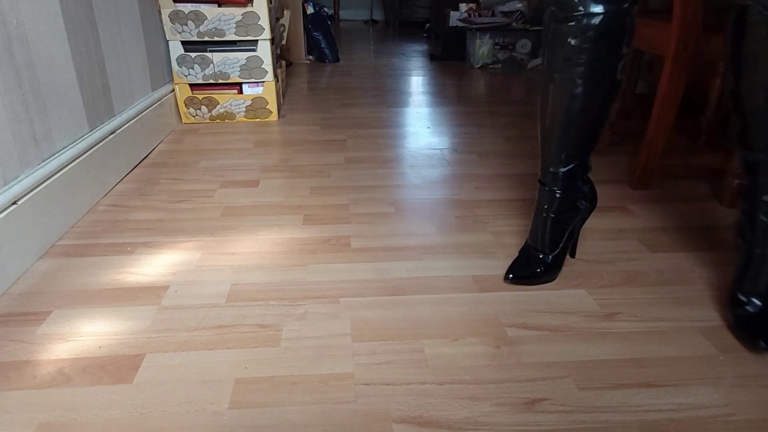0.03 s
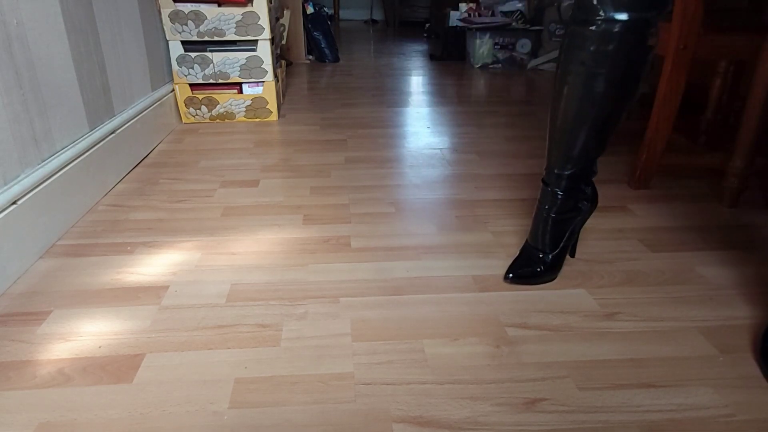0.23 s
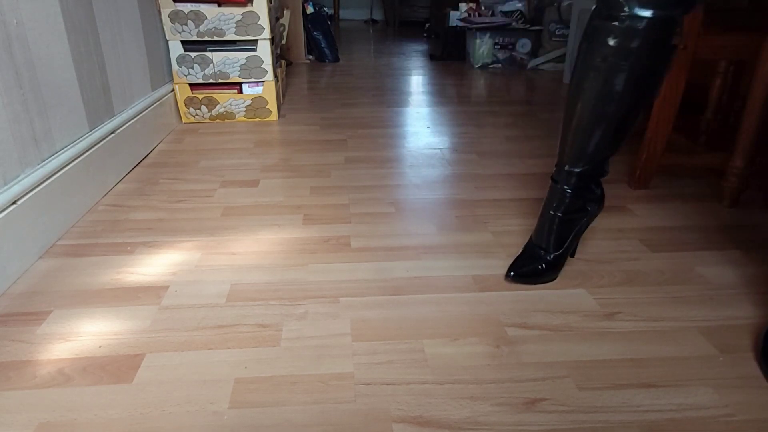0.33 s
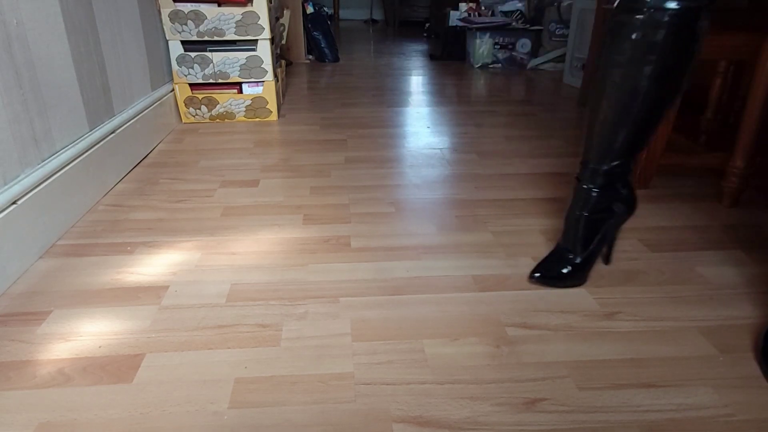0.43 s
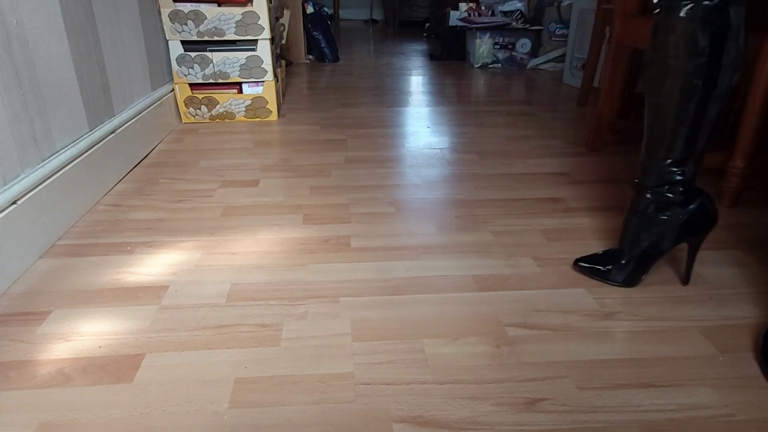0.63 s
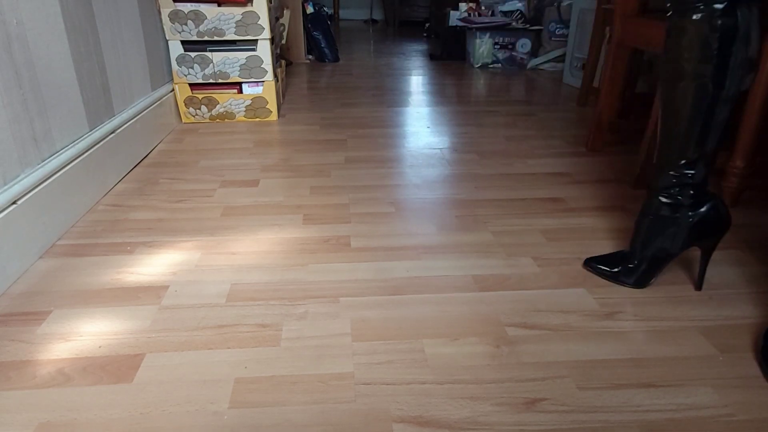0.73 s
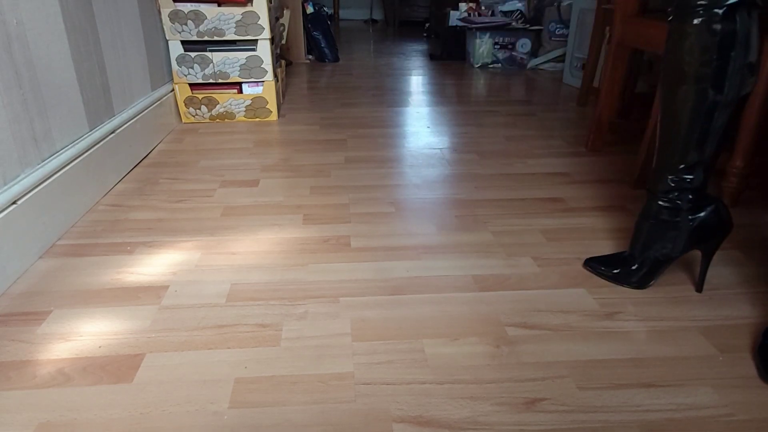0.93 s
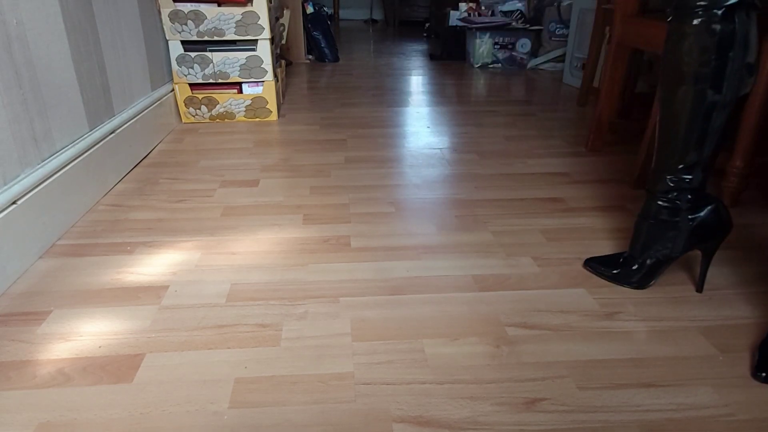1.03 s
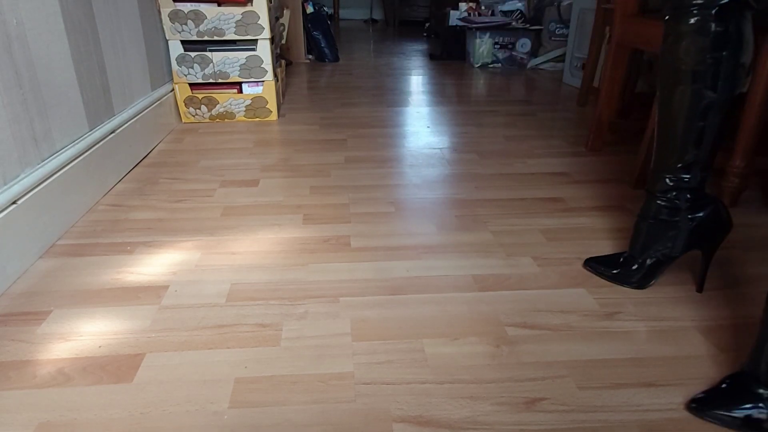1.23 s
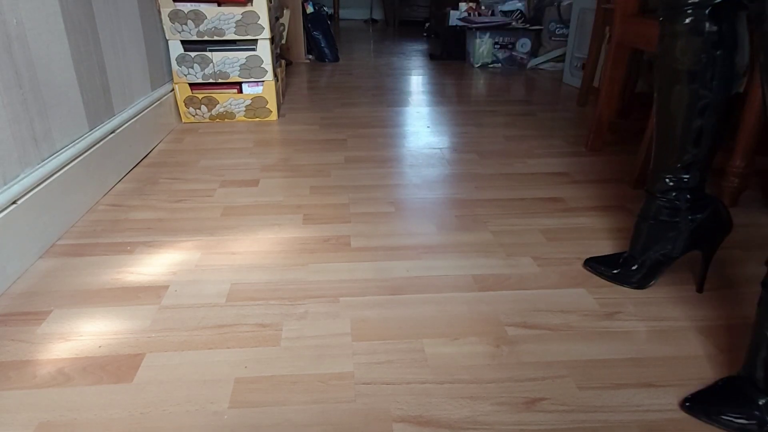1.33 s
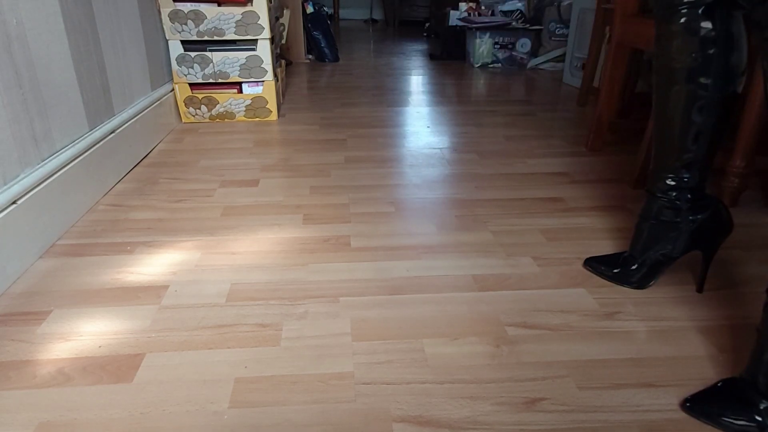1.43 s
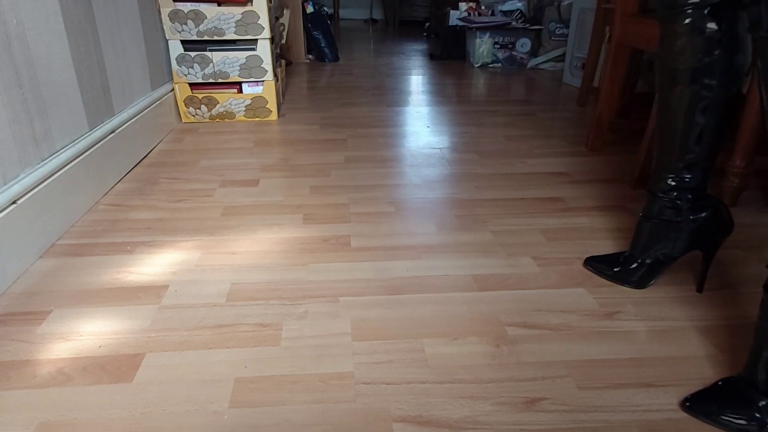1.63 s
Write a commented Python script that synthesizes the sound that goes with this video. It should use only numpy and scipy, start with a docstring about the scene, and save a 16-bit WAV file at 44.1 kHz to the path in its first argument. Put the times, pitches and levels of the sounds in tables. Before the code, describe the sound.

A few slow footsteps in heeled boots sound close by and a little to the right in a small, bare-sounding room. Two firm clicking thuds on laminate come first, then softer steps, while the boots creak and tick as they flex.

```python
"""A few slow steps of high-heeled boots on laminate, slightly to the right, in a small bare room.
Each heel or sole contact is a short thump of the boards plus a click; the floor sags and booms under
the weight. Walls return distinct echoes and the room rings on. The glossy boot shafts rustle, creak
and tick as they flex. Faint hum and hiss lie underneath."""
import sys
import numpy as np
from scipy import signal
from scipy.fft import rfft, irfft, next_fast_len
from scipy.io import wavfile

SR = 44100
rng = np.random.default_rng(int(sys.argv[2]) if len(sys.argv) > 2 else 0)


def store_pcm(level_fs):
    """Save levels as 16-bit WAV."""
    pcm = np.round(np.clip(level_fs, -1, 1) * 32767).astype(np.int16)
    wavfile.write(sys.argv[1], SR, np.atleast_2d(pcm).T)


N = 74970
FFT_SIZE = next_fast_len(N + SR // 2)
TIME_S, HZ = np.arange(N) / SR, np.fft.rfftfreq(FFT_SIZE, 1 / SR)
LEFT_LAG_S, TREBLE_PAN_DB = 0.000401, -1.3

# heel and sole contacts: start_s, thump_db, low_edge_hz, high_edge_hz, click_db, click_edge_hz
CONTACTS = [(.001, -58, 294, 1300, -73, 3130), (0.2208, -31.5, 280, 609, -29, 4800),
            (0.2521, -36, 297, 533, -54, 3000), (.3150, -28.5, 186, 778, -32.5, 2530),
            (.7978, -47, 210, 1010, -44.5, 8900), (0.9509, -33, 295, 785, -45.5, 1600),
            (1.0926, -40.5, 332, 814, -45.5, 2000), (1.166, -50, 280, 846, -55, 2980),
            (1.3006, -40.5, 330, 582, -42, 3500), (1.3320, -46.5, 380, 596, -65, 3000),
            (1.616, -66.5, 410, 1280, -55.5, 3050)]
# contact click spectrum: freq_hz, gain_db
CLICK_SPECTRUM = [(300, 10), (900, 3), (1200, 3.5), (1550, 5.5), (1750, 3), (2100, -3), (2600, 0),
                  (3200, -0.5), (4200, 6), (7000, -16), (15000, -31)]
# heel resonances: freq_hz, width_hz, strength_db
HEEL_RESONANCES = [(1546, 125, -8.5), (2600, 200, -9)]
# floor swings under load: start_s, pitch_hz, level_db, t60_s
FLOOR_SWINGS = [(.226, 150, -56, 0.49), (0.232, 70.2, -53, 0.9), (0.316, 111, -30.5, 0.14),
                (0.327, 80, -58, 0.083), (0.951, 106, -53.5, 0.2), (1.306, 103, -70.5, 0.65)]
# snaps of the boot material: start_s, level_db, pitch_hz, half_width_oct
FOLD_SNAPS = [(0.26, -52, 11000, .6), (0.2746, -46, 8000, 1), (0.2759, -36.5, 5200, .6),
              (0.296, -42.5, 8200, 0.31), (0.2997, -47.5, 6600, 0.17), (0.3984, -43.5, 6400, 1.1),
              (0.4312, -50, 10500, 0.48), (0.458, -48.5, 3970, 1.2), (0.473, -53, 6000, .4),
              (0.5025, -43.5, 5400, 0.63), (0.7989, -48, 6740, 0.46), (0.9274, -57, 6230, 0.19),
              (1.1802, -51, 5940, 0.47), (1.5831, -64, 10000, 0.68)]
# shaft flexes, rise and fall over 20 dB: peak_s, rise_s, fall_s, mid_db, low_trim_db, top_trim_db
SHAFT_FLEXES = [(.01, 0.28, 0.38, -71.5, 6.5, 1), (.18, 0.11, 0.17, -61, 6.5, 1.5),
                (0.317, 0.17, 0.22, -57, 8, 0), (.52, 0.098, 0.071, -81.5, 20, 17),
                (0.683, 0.14, 0.19, -63, 1.5, -4.5), (0.824, 0.034, 0.1, -66.5, 4, -2),
                (.93, .02, 0.081, -75, 4, -2), (.99, 0.13, 0.1, -73.5, -19, -8),
                (1.115, 0.16, 0.29, -71, 1.5, -0.5), (1.183, 0.16, 0.14, -69.5, -21, 2.5),
                (1.34, 0.085, 0.09, -62, 3, 0.5), (1.47, 0.25, 0.22, -73, 0, 0.5),
                (1.619, 0.039, 0.18, -77, -5, 0)]
# rustle spectra, three registers: freq_hz, gain_db
LOW_SPECTRUM = [(400, 0), (1100, -1), (1550, 1.5), (2000, 2.5), (2600, 4), (3200, -1), (4500, 6.5),
                (9000, -128)]
MID_SPECTRUM = [(1500, -28), (3100, -18.5), (4100, -7.5), (5500, -5.5), (7000, -7.5), (9000, -15.5),
                (15000, -27.5)]
TOP_SPECTRUM = [(3000, -60), (7000, -11), (9000, 2.5), (12000, 6.5), (15500, 0)]
# echoes off walls, ceiling and furniture: delay_s, gain_db
REFLECTIONS = [(.0026, -3), (.0052, -11), (.0112, -11), (.0132, -2), (.0171, -.5), (.0192, -12),
               (.0211, -7), (.0232, -11), (.028, -11), (.0301, -5), (.031, -4), (.0343, -7), (.037, -6),
               (.0387, -7), (.0447, -11), (.0483, -10), (.052, -8)]
# standing waves of the room: freq_hz, width_hz, strength_db
STANDING_WAVES = [(229.5, 8, 1), (297.3, 8.5, 4), (355.6, 10.4, 1.5), (468.6, 12, -7.5), (518.7, 23.6, 3),
                  (766, 4, -9)]
# reverberation time: freq_hz, t60_s
REVERB_DECAY = [(100, 0.37), (500, .42), (1500, 0.49), (5000, 0.11), (14000, 0.52)]
# room tone spectra: freq_hz, gain_db
HUM_SPECTRUM = [(20, -14), (32, -9), (42, -17.5), (55, 5.5), (75, -5.5), (100, 0), (140, -5.5), (200, -17),
                (340, -6), (500, -22.5), (780, -14), (1200, -75), (3000, -66)]
HISS_SPECTRUM = [(25, -44), (200, -14), (1200, -6.5), (2000, 1.5), (2600, -3), (3200, -10.5), (4200, -6),
                 (5200, -22), (8000, -9.5), (15000, -5)]


def footsteps(scatter_above_hz=894):
    """Each contact thumps the boards and clicks the heel; furniture smears the treble of the echoes."""
    direct = delay(0, LEFT_LAG_S)
    room_modes, heel_ring = resonances(STANDING_WAVES), resonances(HEEL_RESONANCES)
    mirrored = 1 / np.sqrt(1 + (HZ / scatter_above_hz) ** 8)
    thumps, clicks = np.zeros((2, 2, len(HZ)), complex)
    for start_s, thump_db, low_hz, high_hz, click_db, click_edge_hz in CONTACTS:
        early = early_echoes()
        smeared = early * scatter()
        walls = mirrored * early + np.sqrt(1 - mirrored ** 2) * smeared
        thump_room = (direct + amp(-2.5) * walls) * room_modes + amp(2.5) * reverb(correlation=0.72)
        click_room = direct + amp(-7) * smeared + amp(7) * reverb(correlation=0)
        colour = amp(curve(CLICK_SPECTRUM)) / (1 + (HZ / click_edge_hz) ** 2)
        click = crack(colour, t60_s=0.0074) * heel_ring
        thumps += amp(thump_db) * board_thump(low_hz, high_hz) * thump_room * delay(start_s)
        clicks += amp(click_db) * click * click_room * delay(start_s)
    return waveform(thumps) + pan(waveform(clicks), TREBLE_PAN_DB)


def board_thump(low_hz, high_hz):
    """Spectrum of one downward push on the boards: a cycle or two between the band edges."""
    highpass = signal.butter(2, low_hz, "high", fs=SR, output="sos")
    lowpass = signal.butter(7, high_hz, fs=SR, output="sos")
    push = -signal.sosfilt(np.vstack([highpass, lowpass]), signal.unit_impulse(SR // 10))
    return rfft(push / np.abs(push).max(), FFT_SIZE)


def floor_booms(attack_s=0.0088):
    """The loaded floor swings briefly at a low pitch."""
    swings = np.zeros(N)
    for start_s, pitch_hz, level_db, t60_s in FLOOR_SWINGS:
        age_s = np.maximum(TIME_S - start_s, 0)
        envelope = amp(level_db - 60 * age_s / t60_s) * (1 - np.exp(-(age_s / attack_s) ** 2))
        swings += envelope * np.sin(2 * np.pi * pitch_hz * age_s)
    return pan(filtered(swings, delay(0, left_lag_s=0.0008)), left_db=1.3)


def fold_ticks():
    """Folds of the boot material snap over and sound into the room."""
    ticks = np.zeros((2, len(HZ)), complex)
    for start_s, level_db, pitch_hz, half_width_oct in FOLD_SNAPS:
        colour = 1 / (1 + (np.log2((HZ + 1) / pitch_hz) / half_width_oct) ** 2)
        room = 1 + amp(5) * scatter() + amp(4.5) * reverb(correlation=0)
        ticks += amp(level_db) * crack(colour, t60_s=0.0045) * room * delay(start_s, LEFT_LAG_S)
    return pan(waveform(ticks), TREBLE_PAN_DB)


def shaft_rustle(low_db=-7, top_db=-6.5, roundness=1.014):
    """Each flex of a shaft swells and fades in three registers."""
    powers = np.zeros((3, N))
    for peak_s, rise_s, fall_s, mid_db, low_trim_db, top_trim_db in SHAFT_FLEXES:
        from_peak = np.maximum((peak_s - TIME_S) / rise_s, (TIME_S - peak_s) / fall_s)
        register_db = np.array([[low_db + low_trim_db], [0], [top_db + top_trim_db]])
        powers += amp(mid_db + register_db - 20 * np.abs(from_peak) ** roundness) ** 2
    spectra = LOW_SPECTRUM, MID_SPECTRUM, TOP_SPECTRUM
    rustle = sum(np.sqrt(power) * creak(spectrum) for power, spectrum in zip(powers, spectra))
    return pan(rustle, TREBLE_PAN_DB)


def creak(spectrum, slips_per_s=600, spread_db=4, grain_share=0.24):
    """Tiny stick-slip grains over a smooth rubbing hiss, rms 1."""
    colour = amp(curve(spectrum))
    slips = (rng.random(N) < slips_per_s / SR) * np.sign(rng.standard_normal(N))
    slips *= amp(spread_db * rng.standard_normal(N))
    grains = unit_rms(filtered(slips, colour * delay(0, LEFT_LAG_S)))
    return np.sqrt(grain_share) * grains + np.sqrt(1 - grain_share) * noise(colour, correlation=0.032)


def early_echoes(delay_spread=0.014, lag_spread_s=0.00021):
    """Echo response from one spot on the floor; each echo has its own direction."""
    impulse = np.zeros((2, SR // 10))
    for delay_s, gain_db in REFLECTIONS:
        path_s = delay_s * (1 + delay_spread * rng.standard_normal())
        arrival_s = path_s + lag_spread_s * rng.normal(0.78, 1) * np.array([.5, -.5])
        impulse[np.arange(2), np.round(arrival_s * SR).astype(int)] += amp(gain_db)
    return rfft(impulse, FFT_SIZE)


def scatter(t60_s=0.017):
    """Response of a brief uncoloured smear, different on each side."""
    smear = rfft(rng.standard_normal((2, SR // 20)) * amp(-60 * TIME_S[:SR // 20] / t60_s), FFT_SIZE)
    return smear / np.abs(smear)


def reverb(correlation, build_s=0.0097):
    """Response of the diffuse room tail, energy about 1 a side."""
    freq_hz, age_s, bands = signal.stft(white_pair(SR // 2, correlation), SR, nperseg=256)
    decay = amp(-60 * age_s / curve(REVERB_DECAY, freq_hz)[:, None])
    impulse = signal.istft(bands * decay, SR, nperseg=256)[1]
    impulse *= 1 - np.exp(-(TIME_S[:impulse.shape[1]] / build_s) ** 2)
    return rfft(impulse / np.linalg.norm(impulse[0]), FFT_SIZE)


def room_tone(whirr_hz=947, half_width_hz=72):
    """Low hum, narrow whirr, thin hiss."""
    whirr = noise(1 / (1 + ((HZ - whirr_hz) / half_width_hz) ** 4), correlation=0.28)
    hum = noise(amp(curve(HUM_SPECTRUM)), correlation=0.77)
    hiss = noise(amp(curve(HISS_SPECTRUM)), correlation=0.035)
    return amp(-72.5) * hum + amp(-74.5) * whirr + amp(-80.5) * hiss


def crack(colour, t60_s):
    """Spectrum of a short coloured burst, waveform peak near 1."""
    return unit_rms(colour) * scatter(t60_s)[0] * np.linalg.norm(amp(-60 * TIME_S / t60_s)) / 2


def resonances(modes):
    """Response of a direct path plus ringing modes."""
    return 1 + sum(amp(strength_db) * 1j * HZ * width_hz / (freq_hz ** 2 - HZ ** 2 + 1j * HZ * width_hz)
                   for freq_hz, width_hz, strength_db in modes)


def white_pair(samples, correlation):
    """White noise with a given left-right correlation."""
    mid, side = rng.standard_normal((2, samples))
    angle_rad = np.arccos(correlation) / 2
    return mid * np.cos(angle_rad) + side * np.sin(angle_rad) * np.array([[1], [-1]])


def noise(colour, correlation):
    """Coloured stereo noise, rms 1."""
    return unit_rms(filtered(white_pair(N, correlation), colour))


def delay(delay_s, left_lag_s=0):
    """Stereo delay response."""
    return np.exp(-2j * np.pi * HZ * (delay_s + np.array([[.5], [-.5]]) * left_lag_s))


def pan(x, left_db):
    """Opposite gains on the two sides; negative leans right."""
    return x * amp(left_db * np.array([[1], [-1]]))


def filtered(x, response):
    return waveform(rfft(x, FFT_SIZE) * response)


def waveform(spectrum):
    return irfft(spectrum, FFT_SIZE)[..., :N]


def curve(points, at_hz=HZ):
    """Interpolate over log frequency."""
    freq_hz, values = np.transpose(points)
    return np.interp(np.log(at_hz + 1), np.log(freq_hz + 1), values)


def amp(db):
    return 10 ** (np.asarray(db) / 20)


def unit_rms(x):
    return x / np.sqrt(np.mean(x ** 2) + 1e-20)


def scene():
    """Boots, floor and room."""
    return footsteps() + floor_booms() + fold_ticks() + shaft_rustle() + room_tone()


def record(dry):
    """Hard band limit at 15900 Hz."""
    return filtered(dry, HZ < 15900)


dry = scene()
out = record(dry)
store_pcm(out)
```